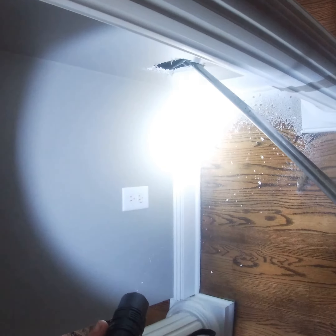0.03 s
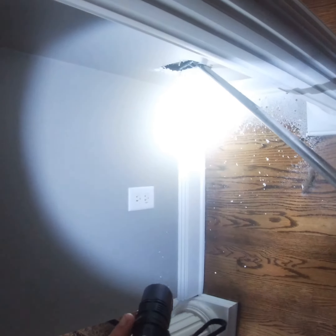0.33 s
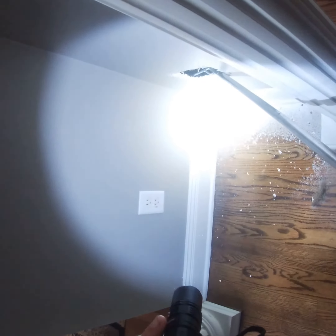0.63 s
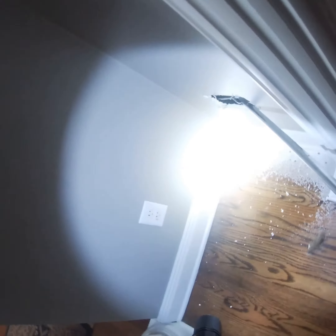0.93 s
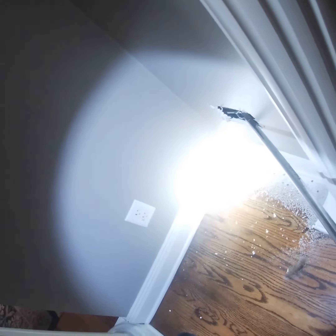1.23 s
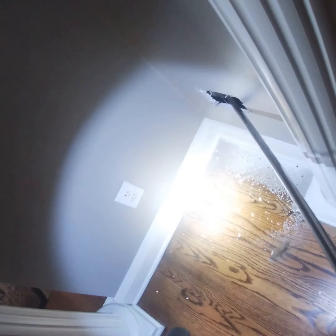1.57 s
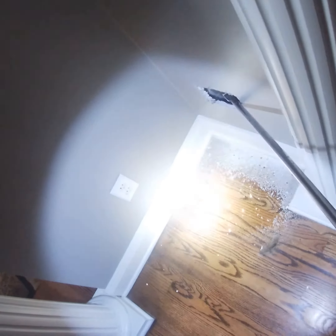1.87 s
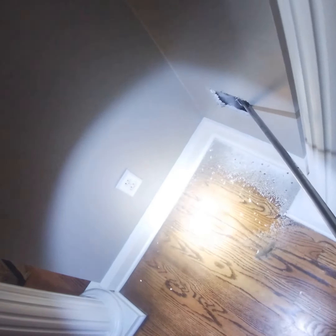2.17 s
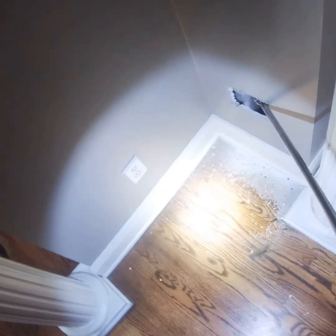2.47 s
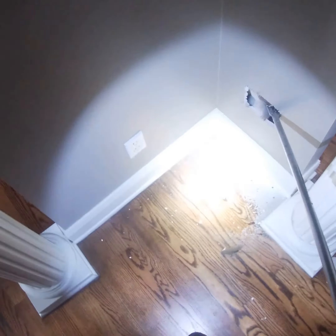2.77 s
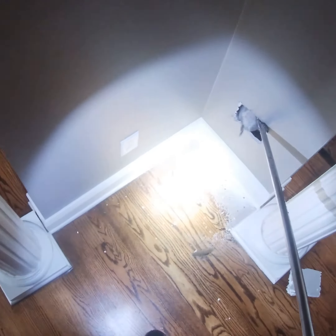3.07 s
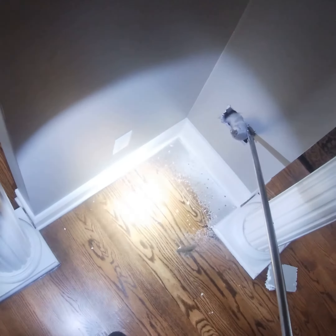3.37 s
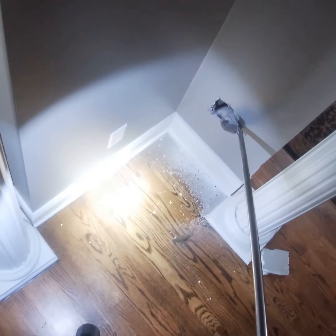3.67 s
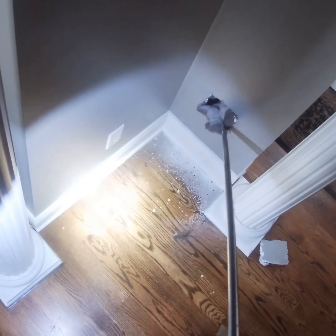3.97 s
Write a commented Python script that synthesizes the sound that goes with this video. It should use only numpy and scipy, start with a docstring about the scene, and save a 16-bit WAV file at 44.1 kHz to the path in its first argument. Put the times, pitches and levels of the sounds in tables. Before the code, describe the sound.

Dry scraping, cracking plaster and hollow knocks as a pole works inside a wall hole.

```python
"""In a bare room with a wooden floor, a pole is worked about in a hole in a plasterboard wall.
It slides on the rim with a dry rustle and twice digs in: the plaster crunches and cracks,
the hollow wall knocks, the tip judders and squeaks, and loosened dust trickles down.
Under it lie room hiss, the rumble and bumps of a hand on the microphone,
a faint fluttering electrical whine and one dry click."""
import sys
import numpy as np
from scipy import signal
from scipy.fft import rfft, irfft
from scipy.io import wavfile
from scipy.ndimage import uniform_filter1d

SR = 44100
rng = np.random.default_rng(int(sys.argv[2]) if len(sys.argv) > 2 else 0)


def put_to_file(sound):
    """Save the sound as 16-bit audio at rate SR, in the file named by the first command-line argument."""
    columns = np.atleast_2d(sound).T  # one column per channel
    safe = np.clip(columns, -1, 1)
    whole_steps = np.round(safe * 32767)
    wavfile.write(sys.argv[1], SR, whole_steps.astype(np.int16))


N = 176400  # 4 seconds
TIME = np.arange(N) / SR


def from_db(db):
    """Turn decibels into a number to multiply by."""
    return 10 ** (np.asarray(db) / 20)


def rms_one(x):
    """Scale a sound so its average strength (rms) is 1."""
    return x / np.sqrt(np.mean(x ** 2) + 1e-20)


def level(rows):
    """Join (seconds, dB) points into a volume curve."""
    return from_db(np.interp(TIME, *np.transpose(rows)))


def colour(x, points, size=16384):
    """Shape the tone with (Hz, dB) points; white noise keeps its overall power."""
    hz, db = np.transpose(points)
    half = size // 2
    log_hz = np.log(np.arange(half + 1) * SR / size + 1)
    gain = rms_one(from_db(np.interp(log_hz, np.log(hz), db)))
    # build the filter so it never sounds ahead of its input
    cepstrum = irfft(np.log(gain))
    cepstrum[1:half] *= 2
    cepstrum[half + 1:] = 0
    response = irfft(np.exp(rfft(cepstrum)))[:half]
    return signal.oaconvolve(x, response)[:N]


def lowpass(x, order, hz):
    """Soften everything above hz."""
    return signal.sosfilt(signal.butter(order, hz, fs=SR, output="sos"), x)


def ring(x, hz, t60):
    """Each click in x starts a tone that fades by 60 dB in t60 seconds."""
    r, w = np.exp(-np.log(1000) / (t60 * SR)), 2 * np.pi * hz / SR
    return signal.lfilter([0, np.sin(w)], [1, -2 * r * np.cos(w), r * r], x + 1e-18)


def add(track, s, sound):
    """Mix a sound into the track at s seconds."""
    i = int(s * SR)
    track[i:i + len(sound)] += sound[:max(N - i, 0)]


def grains(per_s, spread_db):
    """Random clicks of uneven size."""
    sizes = from_db(spread_db * np.minimum(rng.exponential(1, N), 4)) * rng.choice([-1, 1], N)
    return rms_one(sizes * (rng.random(N) < per_s / SR))


def swell(s, rise, fall):
    """A bell-shaped volume curve with its top at s seconds."""
    out = np.zeros(N)
    near = slice(max(int((s - 4 * rise) * SR), 0), int((s + 4 * fall) * SR))
    t = TIME[near] - s
    out[near] = np.exp(-.5 * (t / np.where(t < 0, rise, fall)) ** 2)
    return out


# Tone of the room hiss. Each row: frequency in Hz, relative level in dB.
HISS_TONE = [(50,-4.5),(100,-1.5),(180,-1),(250,-5.5),(400,-15.5),(560,-16.5),(780,-4.5),(1000,-15),(1250,-12),(1900,-12),(2500,-16.5),(3800,-18),(4700,-16.5),(5500,-19),(8000,-21.5),(11000,-30),(14000,-39),(16000,-53)]

def hiss(db=-70.5):
    """The room's steady, soft hiss."""
    return from_db(db) * lowpass(colour(rng.standard_normal(N), HISS_TONE), 1, hz=9000)


# How the rumble rises and falls. Each row: time in seconds, level in dB.
RUMBLE_LEVELS = [(0.0, -24), (0.09, -46.5), (0.39, -36), (0.5, -49), (1.26, -38), (1.39, -48.5),
                 (1.51, -29.5), (2.22, -32.5), (2.26, -45.5), (2.65, -31.5), (2.77, -44.5), (3.1, -27),
                 (3.23, -49.5), (3.44, -37.5), (3.48, -44.5), (3.64, -37.5), (3.92, -38), (4.0, -54)]
# Its tone. Each row: frequency in Hz, relative level in dB.
RUMBLE_TONE = [(12,-15),(22,-6),(33,2),(42,-6.5),(55,-16),(75,-30),(110,-44),(200,-54),(500,-86)]

def rumble():
    """Holding the microphone makes a deep, uneven rumble."""
    return level(RUMBLE_LEVELS) * rms_one(colour(rng.standard_normal(N), RUMBLE_TONE))


# Tones of the whine and its ticks. Each row: frequency in Hz, relative level in dB.
WHINE_TONE = [(3000,-43),(5200,-6),(6000,6),(6500,-4),(7400,7),(7900,-30),(10000,-10.5),(14000,-45)]
TICK_TONE = [(4000,-12),(7400,4.5),(9700,-15),(10500,4.5),(11400,-8),(14000,-32),(16000,-40)]

def whine(swells_per_s=30, first_s=0.0119, tick_lag_s=0.0124, whine_db=-78.5, tick_db=-84):
    """A faint electrical whine flutters in uneven swells; each ends in a tiny tick."""
    cycle = swells_per_s * (TIME - first_s)
    swells = np.abs(np.cos(np.pi * cycle)) ** 3
    ticks = np.cos(np.pi * (cycle - swells_per_s * tick_lag_s)) ** 60  # a high power keeps them short
    strength = from_db(2.5 * rng.standard_normal((1000, 2)))[np.round(cycle).astype(int)]
    flutter = colour(rms_one(swells * strength[:, 0] * rng.standard_normal(N)), WHINE_TONE)
    ticking = colour(rms_one(ticks * strength[:, 1] * rng.standard_normal(N)), TICK_TONE)
    return from_db(whine_db) * flutter + from_db(tick_db) * ticking


# Bumps of the hand. Each row: loudest moment in seconds, level in dB.
HAND_BUMPS = [(0.018,-61),(.11,-64),(.19,-65.5),(.40,-74.5),(0.608,-68.5),(2.521,-64.5),(2.60,-59.5),(3.87,-65)]
# Their tone. Each row: frequency in Hz, relative level in dB.
BUMP_TONE = [(60,-16),(120,-10),(160,5.5),(210,-3),(300,-18),(600,-28),(2000,-46),(6000,-88)]

def bumps():
    """The hand bumps the microphone with soft, dull thuds."""
    volume = sum(from_db(db) * swell(s, rise=0.017, fall=0.024) for s, db in HAND_BUMPS)
    return volume * colour(rng.standard_normal(N), BUMP_TONE)


# Strokes of the pole on the rim. Each row: loudest moment in seconds, relative level in dB,
# rise in seconds, fall in seconds, centre pitch in Hz.
RUB_STROKES = [(1.045,-67,0.023,0.032,1580),(1.31,-62,.06,0.11,2500),(1.48,-55,0.062,0.14,2020),(1.69,-44.5,0.027,0.021,2230),(1.82,-53.5,0.023,0.04,2080),(1.905,-50,0.016,0.016,2060),(1.985,-53,0.066,0.021,2120),(2.13,-53,0.13,0.14,2030),(2.30,-60,0.045,0.039,1860),(2.41,-59.5,0.0029,0.026,3400),(2.485,-53,0.022,0.029,2700),(2.50,-61.5,0.087,0.084,1530),(2.68,-58.5,0.13,.10,2110),(2.785,-46.5,0.016,.04,1570),(3.025,-46.5,0.025,0.02,1900),(3.195,-51.5,0.0067,0.01,1690),(3.33,-70,0.14,0.11,1620),(3.49,-58.5,0.021,0.035,2050),(3.58,-56.5,0.015,0.022,1770),(3.645,-55.5,.015,0.027,1910),(3.74,-65.5,0.048,0.036,1460),(3.85,-54.5,0.024,0.029,1970),(3.95,-67,0.045,0.029,2210)]
# Tone of the rubbing. Each row: frequency in Hz, relative level in dB.
RUB_TONE = [(200,-22),(600,-15),(1000,-4),(1450,5),(1700,0),(1950,3.5),(2350,-2.5),(2900,-4.5),(3500,0),(4100,-13.5),(5000,-11.5),(8000,-30),(13000,-49),(16000,-50)]

def rubs(gain_db=-2.5):
    """Sliding makes a dense rustle of tiny clicks; each stroke favours its own range of pitch."""
    out = np.zeros(N)
    friction = colour(grains(per_s=4000, spread_db=4), RUB_TONE)
    for k, (s, db, rise, fall, hz) in enumerate(RUB_STROKES):
        shifted = np.roll(friction, k * N // len(RUB_STROKES))
        rustle = rms_one(signal.lfilter(*signal.iirpeak(hz, Q=3.1, fs=SR), shifted))
        out += from_db(db + gain_db) * swell(s, rise, fall) * rustle
    return out


# How hard the tip digs in. Each row: time in seconds, relative level in dB.
DIG_LEVELS = [(1.1,-105),(1.25,-69),(1.44,-60.5),(1.47,-51.5),(1.575,-50),(1.60,-70),(1.63,-55),(1.675,-44),(1.74,-55),(1.86,-58),(1.97,-52.5),(2.05,-64),(2.35,-69.5),(2.45,-68),(2.55,-81),(2.7,-59),(2.78,-56.5),(2.88,-51),(2.94,-45),(3.03,-51.5),(3.08,-57.5),(3.15,-60),(3.18,-76),(3.24,-74),(3.45,-68),(3.62,-66),(3.8,-69.5),(3.9,-61.5),(3.93,-56),(4,-61)]
# Tone of breaking plaster. Each row: frequency in Hz, relative level in dB.
PLASTER_TONE = [(150,-10.5),(400,-20),(700,-8),(1100,-6.5),(1500,1.5),(1750,-3),(2250,6.5),(2700,2),(3100,-6),(3500,2.5),(4050,-8),(4650,-3),(5300,-6),(6300,-12),(7300,-14),(8700,-22.5),(9900,-20.5),(11500,-29),(14000,-50),(16000,-60)]

def crunch(gain_db=-2.5, clump_db=5, clump_s=0.0077):
    """Coarse grains of plaster give way under the tip, in small clumps."""
    wobble = np.clip(rng.standard_normal(N), -2, 2)
    clumps = rms_one(from_db(clump_db * np.interp(TIME / clump_s, np.arange(N), wobble)))
    crumbs = grains(per_s=800, spread_db=1) * clumps * level(DIG_LEVELS)
    return from_db(gain_db) * colour(crumbs, PLASTER_TONE)


def click(start_s=1.387, db=-32, fade_s=0.006):
    """One dry electrical click: a sudden jump that sinks back."""
    out = np.zeros(N)
    add(out, start_s, -from_db(db) * np.exp(-TIME / fade_s))
    return out


# Cracks in the plaster. Each row: start in seconds, relative level in dB, fade time in seconds,
# pitch of the chip in Hz, frequency in Hz above which the treble softens.
PLASTER_CRACKS = [(1.460,-45,0.011,2600,5050),(1.473,-44,0.0095,3320,6000),(1.511,-42.5,0.018,2400,6740),(1.541,-45,0.012,2540,5960),(1.570,-47.5,0.013,4800,7000),(1.6095,-45.5,0.0059,3370,5030),(1.633,-42,0.011,3660,6000),(1.6395,-27.5,0.004,3790,5800),(1.644,-34.5,0.0036,2290,3000),(1.675,-42.5,0.015,2380,8000),(1.881,-43,0.0054,2140,3930),(1.932,-45,0.0069,2470,4900),(1.9395,-31,0.0042,3670,3900),(1.945,-37,0.0065,2600,3000),(2.119,-52.5,0.0086,4700,7000),(2.584,-46,0.0071,2160,4660),(2.715,-49,0.018,3250,6000),(2.760,-38.5,.005,2700,4700),(2.766,-36,0.0051,980,8000),(2.781,-42,0.0089,1870,3980),(2.811,-41,0.0051,3400,7000),(2.858,-43.5,0.018,2080,5860),(2.912,-41,0.014,805,6100),(2.926,-39,.01,3500,10000),(2.990,-31.5,0.0048,5380,10200),(3.023,-42.5,0.0042,5600,8000),(3.083,-47,0.0043,5400,8000),(3.194,-52,0.012,1960,2200),(3.371,-59,0.0038,1800,3000),(3.559,-50,0.012,1540,2310),(3.909,-43.5,0.0032,2320,2600)]

def cracks(gain_db=-0.5, chip_db=-6, chip_cycles=16):
    """Each crack is a quickly fading run of tiny breaks that also rings a loose chip."""
    out, t = np.zeros(N), TIME[:SR // 10]
    breaks = colour(grains(per_s=9700, spread_db=5), PLASTER_TONE)
    for k, (s, db, fade_s, hz, edge_hz) in enumerate(PLASTER_CRACKS):
        run = breaks[k * len(t):(k + 1) * len(t)] * np.exp(-t / fade_s)
        run = rms_one(lowpass(run, 2, edge_hz))
        chip = from_db(chip_db) * rms_one(ring(run, hz, chip_cycles / hz))
        length_gain = np.sqrt(fade_s / (2 * t[-1]))  # longer cracks carry more energy
        add(out, s, from_db(db + gain_db) * length_gain * (run + chip))
    return out


# Knocks of the pole on the wall. Each row: start in seconds, peak level in dB, pitch in Hz.
POLE_KNOCKS = [(1.535,-25.5,198),(1.64,-24,144),(1.660,-24.5,180),(1.729,-24,189),(1.934,-24,165),(1.962,-30.5,159),(2.589,-46,148),(2.714,-41,194),(2.762,-22,193),(2.798,-30,237),(2.815,-27.5,187),(2.852,-34.5,223),(2.916,-16.5,175),(2.967,-22.5,141),(2.986,-22.5,145),(3.007,-24.5,150),(3.045,-28.5,171),(3.064,-34,132),(3.154,-44,170),(3.528,-44.5,170),(3.558,-44,270),(3.925,-49,220)]

def knocks(contact_hz=240, cycles=3.8):
    """Each knock bends the board back and forth a few times."""
    out, t = np.zeros(N), TIME[:SR // 10]
    push = np.exp(-2 * np.pi * contact_hz * t)
    for s, db, hz in POLE_KNOCKS:
        flex = ring(push, hz, cycles / hz)
        flex = ring(np.diff(flex, prepend=0), hz, cycles / hz)  # ringing twice softens the start
        add(out, s, -from_db(db) * flex / np.abs(flex).max())
    return out


# Notes of the hollow wall. Each row: pitch in Hz, relative level in dB.
WALL_NOTES = [(105,-30.5),(142,-18),(163,-14.5),(176,-22.5),(205,-21),(222,-23),(262,-27),(331,-25.5),(395,-36),(473,-37),(515,-29.5),(596,-36.5)]

def hollow_wall(gain_db=-4, drag_db=-21, ring_s=0.37):
    """The knocks and the dragging tip set the hollow wall ringing."""
    out = np.zeros(N)
    times, peaks_db, _ = np.transpose(POLE_KNOCKS)
    uneven_db = rng.normal(0, 0.83, (len(POLE_KNOCKS), len(WALL_NOTES)))
    drag = from_db(drag_db) * grains(per_s=300, spread_db=11) * level(DIG_LEVELS)
    for k, (hz, db) in enumerate(WALL_NOTES):
        blows = drag.copy()
        blows[(times * SR).astype(int)] += from_db(peaks_db + uneven_db[:, k])
        out += from_db(db + gain_db) * ring(blows, hz, ring_s)
    return out


# Low judders of the board under the dragging tip, and high squeaks of the tip itself.
# Each row: loudest moment in seconds, level in dB, rise and fall time in seconds, pitch in Hz.
BOARD_JUDDERS = [(1.672,-48,0.017,461.7),(1.72,-53.5,0.034,440),(2.23,-67.5,0.039,470),(2.87,-49,0.0091,535),(2.925,-40.5,0.011,462),(2.985,-38.5,0.023,332),(2.995,-48.5,0.019,480),(3.05,-53,.02,335),(3.58,-62.5,0.03,340),(3.96,-63.5,.03,270)]
TIP_SQUEAKS = [(2.946,-35.5,0.0027,2970),(2.9545,-46,0.0026,2790),(2.973,-48,0.0042,2987)]

def stick_slip(rows, wander):
    """The tip catches and slips at a wavering rate: a short, rough tone for each row."""
    out = np.zeros(N)
    for s, db, width_s, hz in rows:
        waver = rms_one(uniform_filter1d(rng.standard_normal(N), size=int(2 * SR / hz)))
        pitch_hz = hz * (1 + wander * waver)
        tone = np.sqrt(2) * np.sin(2 * np.pi * np.cumsum(pitch_hz) / SR)
        out += from_db(db) * swell(s, width_s, width_s) * tone
    return out


# The trickle of dust. Each row: time in seconds, level in dB.
DUST_LEVELS = [(3.25,-100),(3.4,-76.5),(3.58,-75),(3.7,-74),(3.8,-91)]
# Its tone. Each row: frequency in Hz, relative level in dB.
DUST_TONE = [(2000,-15),(5000,-6),(8000,-2),(9000,-14),(9700,0),(10600,-8),(12000,-18),(16000,-31)]

def dust():
    """Loosened dust falls in a thin, high patter of tiny grains."""
    return colour(grains(per_s=3300, spread_db=2.5) * level(DUST_LEVELS), DUST_TONE)


def room(x, echo_db, low_fade_s=0.5, treble_fade_s=0.41, first_echo_s=0.0057):
    """The bare room adds a wash of echoes whose treble dies sooner."""
    t, noise = TIME[:SR], rng.standard_normal(SR)
    low = lowpass(noise, 1, hz=4000)
    tail = low * from_db(-60 * t / low_fade_s) + (noise - low) * from_db(-60 * t / treble_fade_s)
    tail *= t > first_echo_s
    return x + from_db(echo_db) * signal.fftconvolve(x, tail / np.linalg.norm(tail))[:N]


def scene():
    """Mix one channel: the pole and wall echo in the room, the other sounds stay dry."""
    scraping = rubs() + crunch() + cracks() + stick_slip(TIP_SQUEAKS, wander=0.043)
    board = knocks() + hollow_wall() + stick_slip(BOARD_JUDDERS, wander=0.16)
    wall = room(scraping, echo_db=-6) + room(board, echo_db=-7.5)
    return (wall + dust() + bumps() + hiss() + rumble() + whine() + click())[None]


def record(dry):
    """Cut the highest treble, from 16000 Hz up."""
    return signal.sosfilt(signal.cheby2(12, 60, 16000, fs=SR, output="sos"), dry)


dry = scene()
out = record(dry)
put_to_file(out)
```